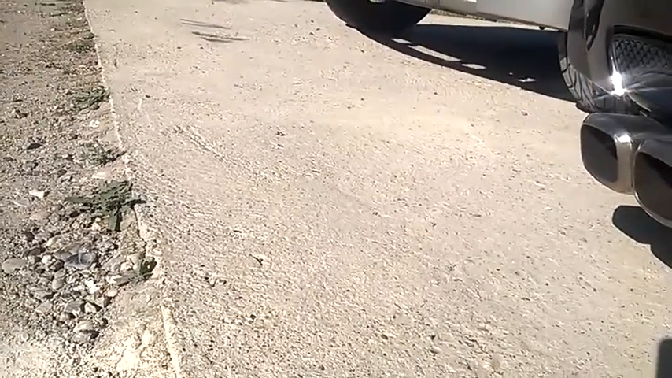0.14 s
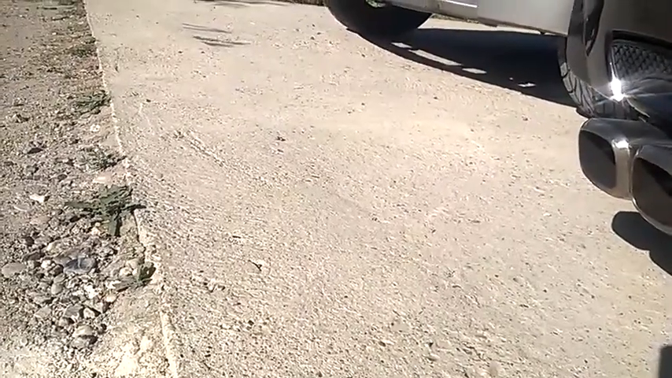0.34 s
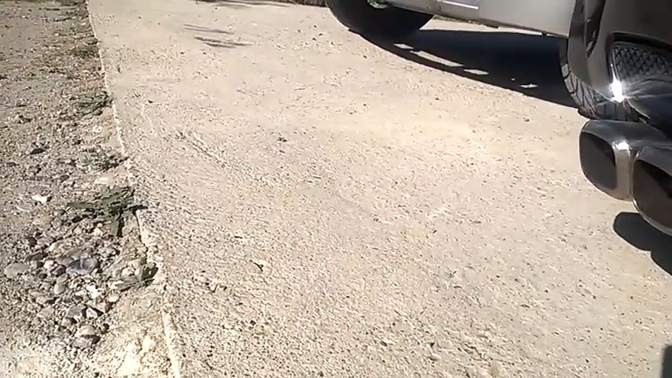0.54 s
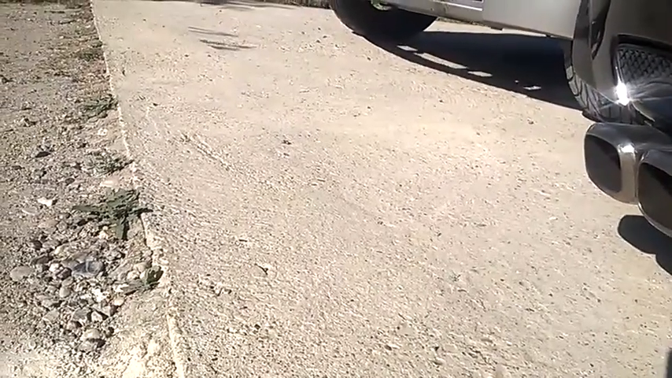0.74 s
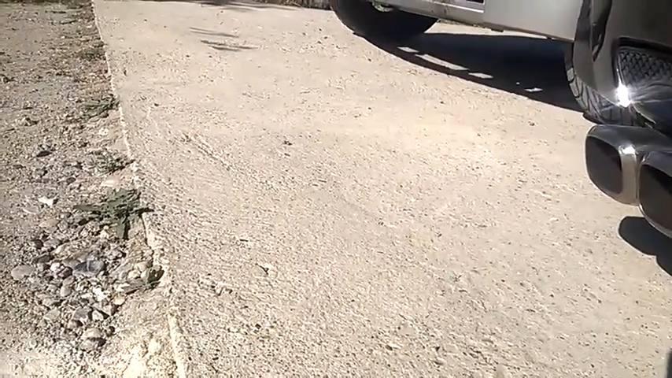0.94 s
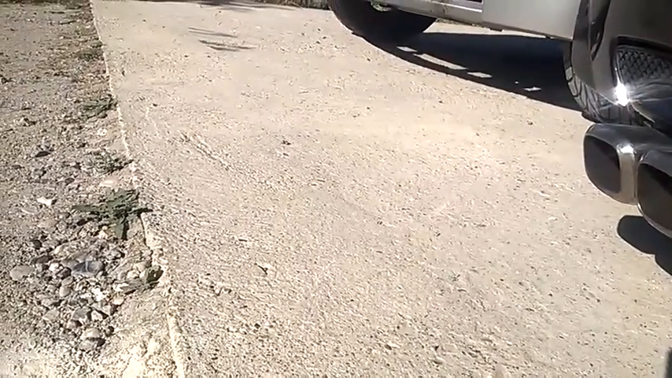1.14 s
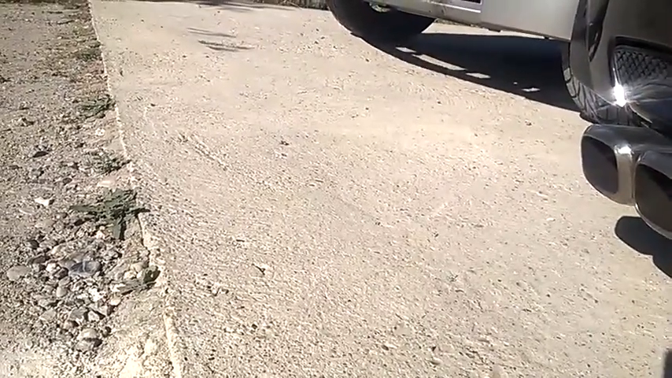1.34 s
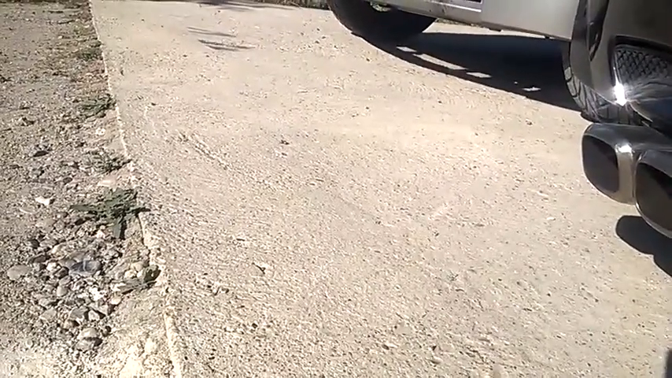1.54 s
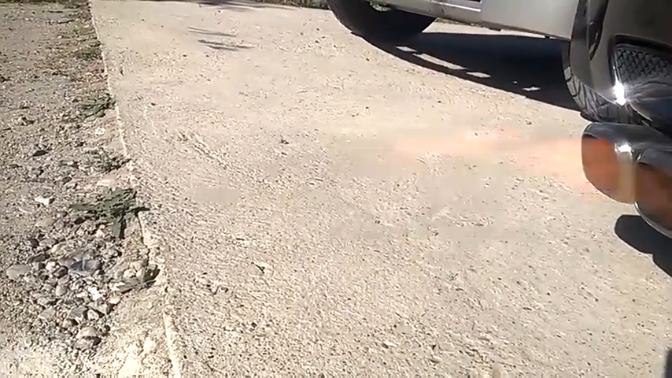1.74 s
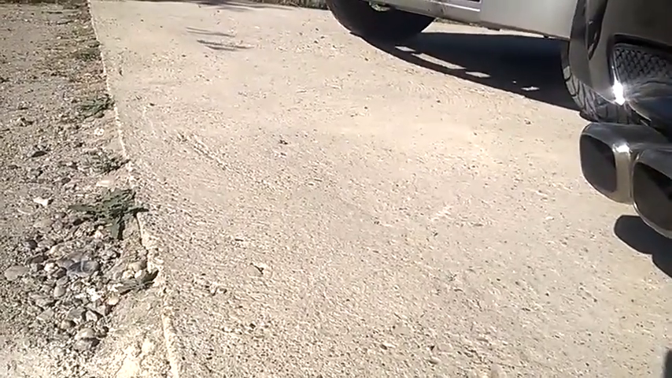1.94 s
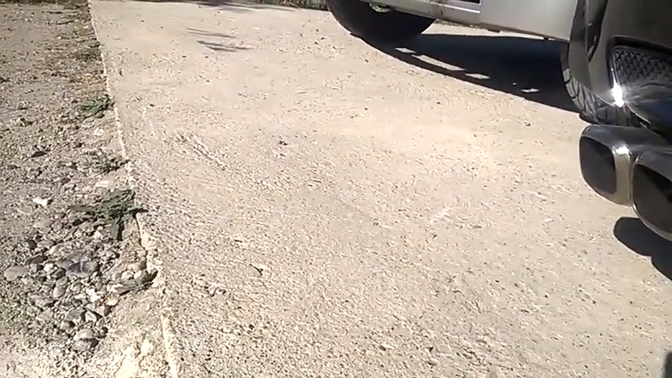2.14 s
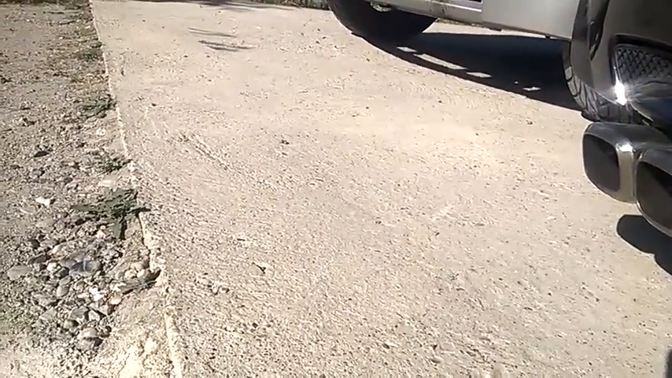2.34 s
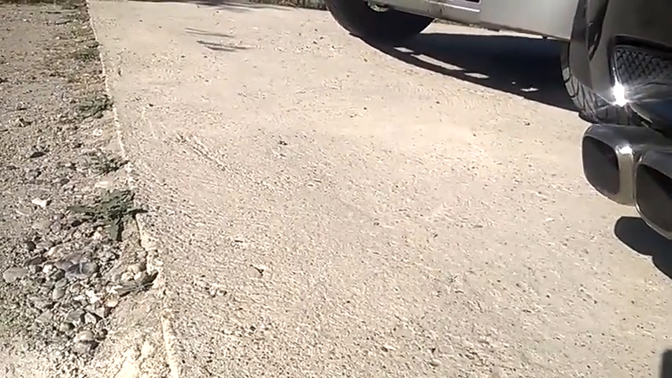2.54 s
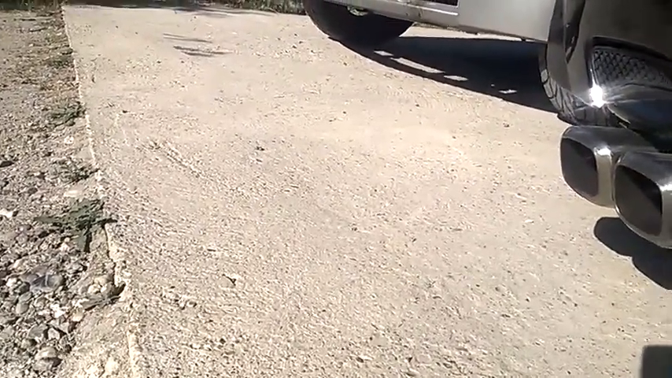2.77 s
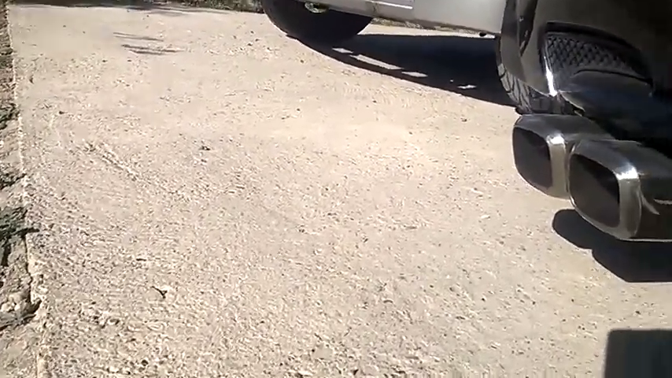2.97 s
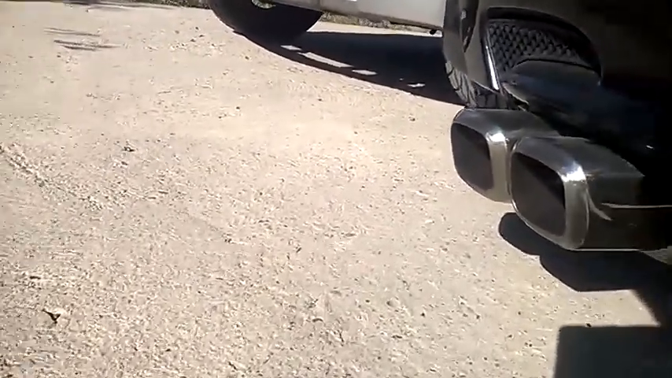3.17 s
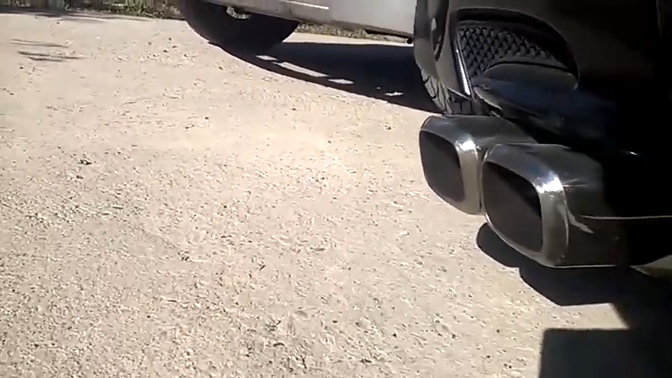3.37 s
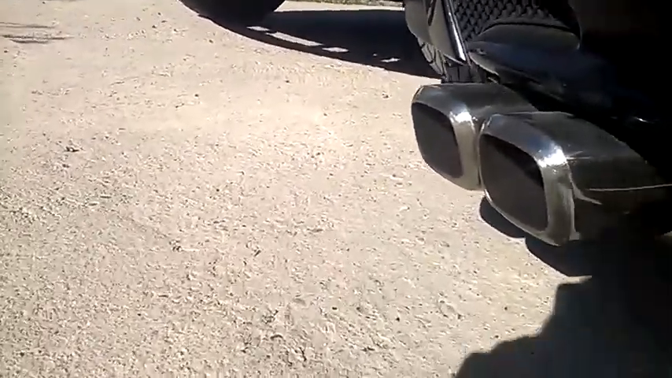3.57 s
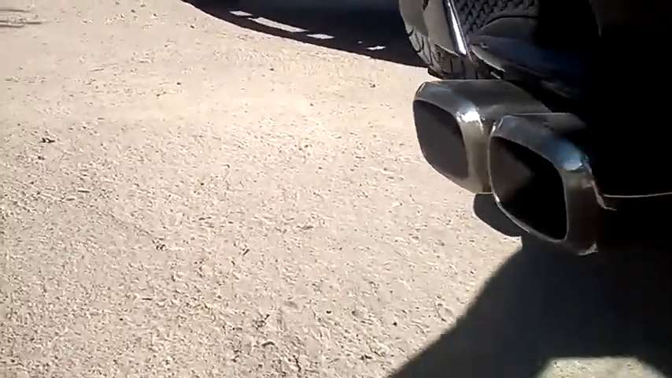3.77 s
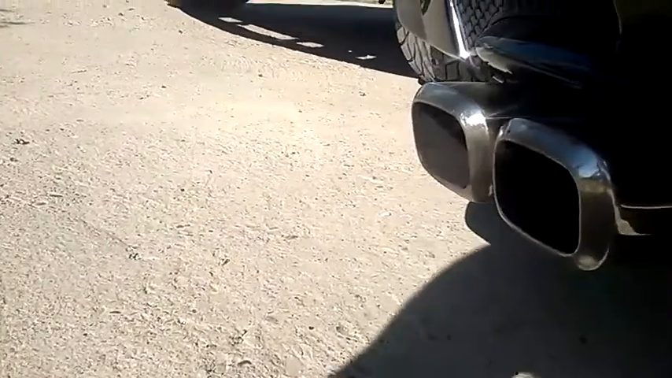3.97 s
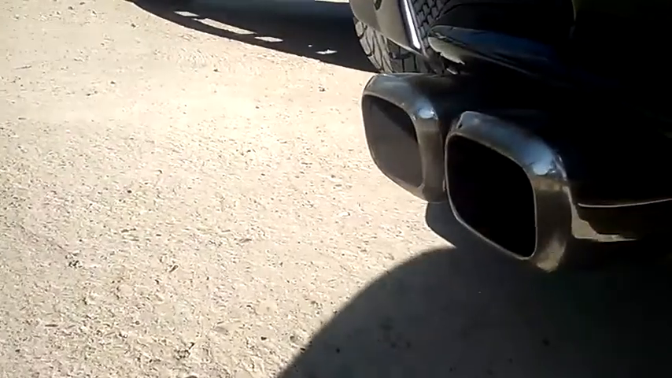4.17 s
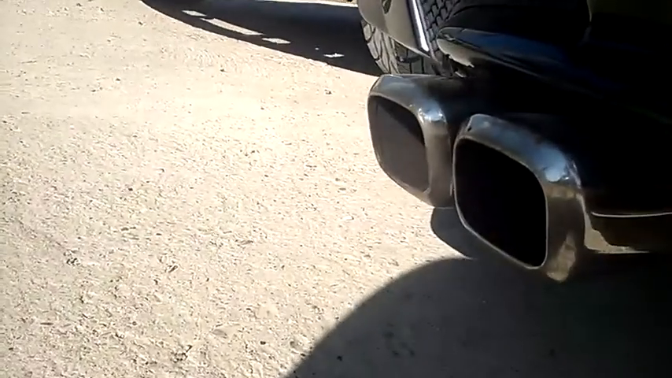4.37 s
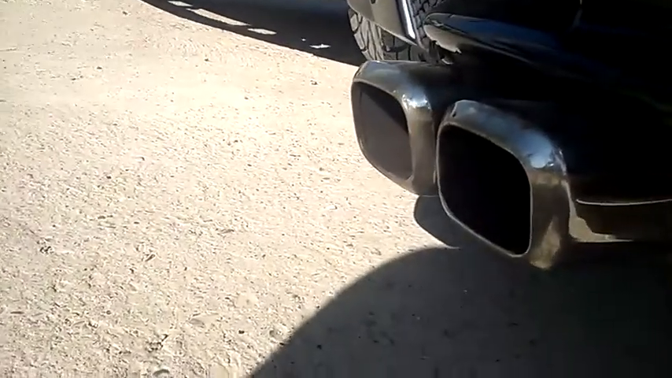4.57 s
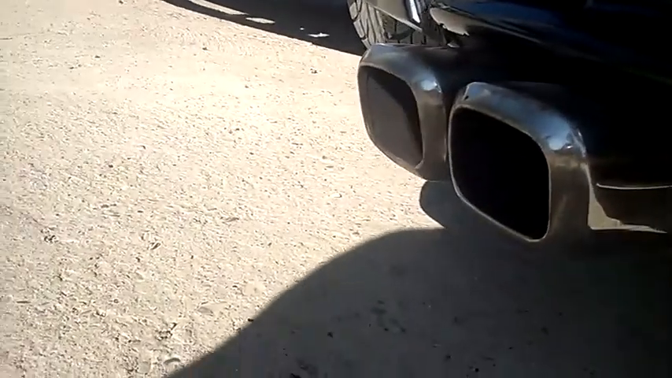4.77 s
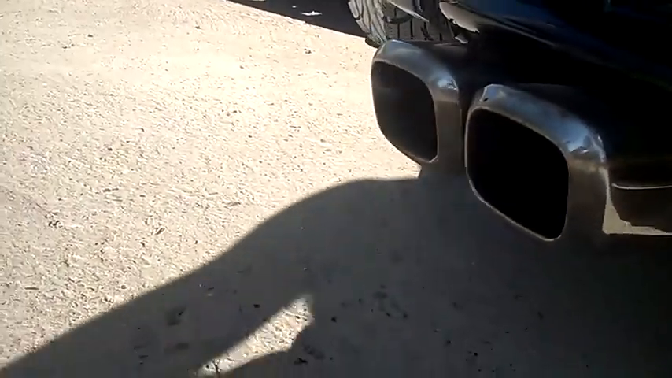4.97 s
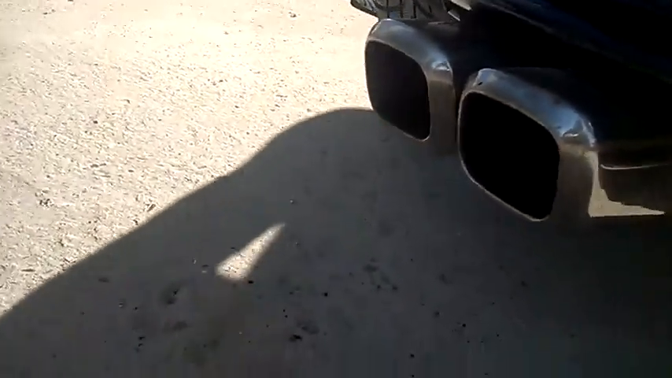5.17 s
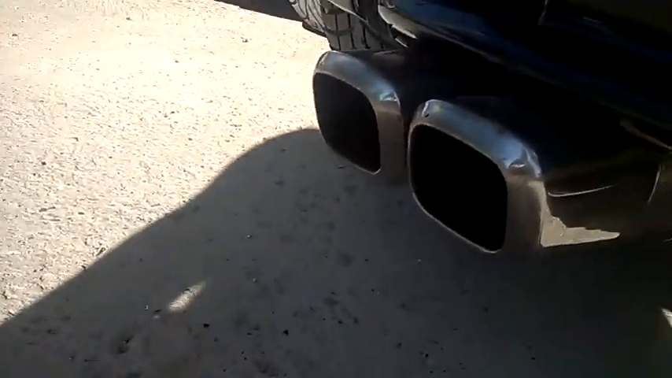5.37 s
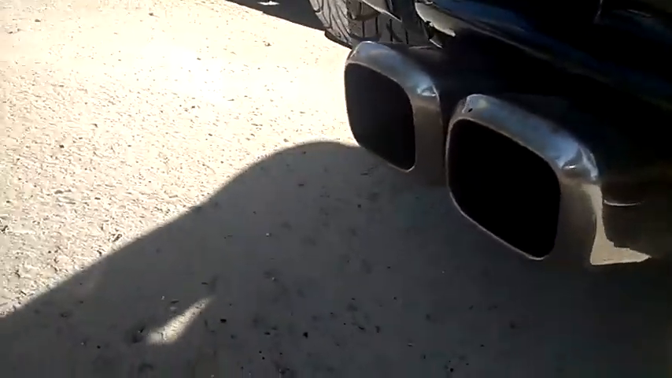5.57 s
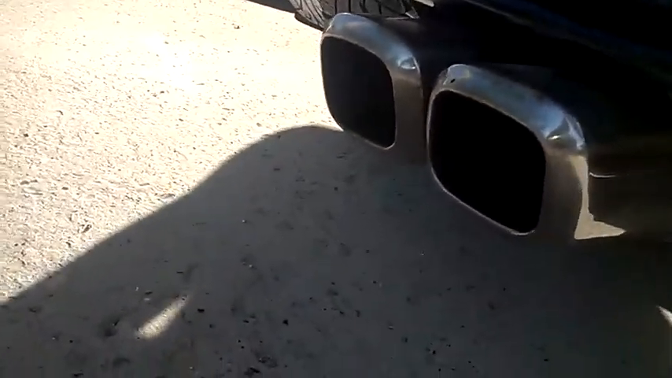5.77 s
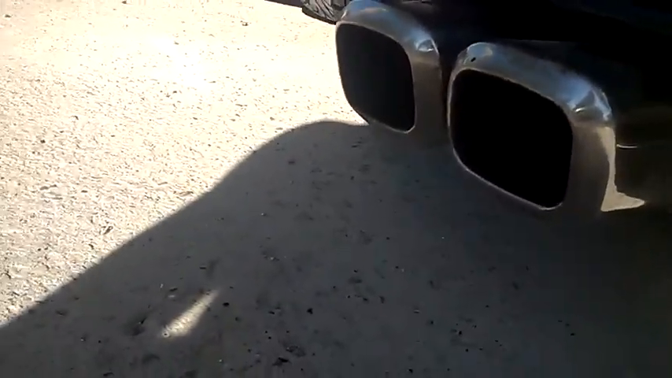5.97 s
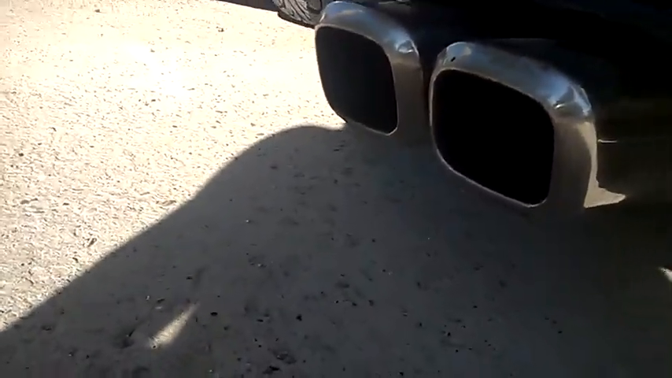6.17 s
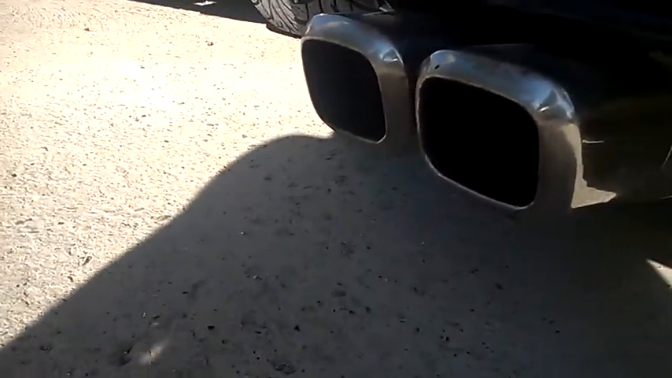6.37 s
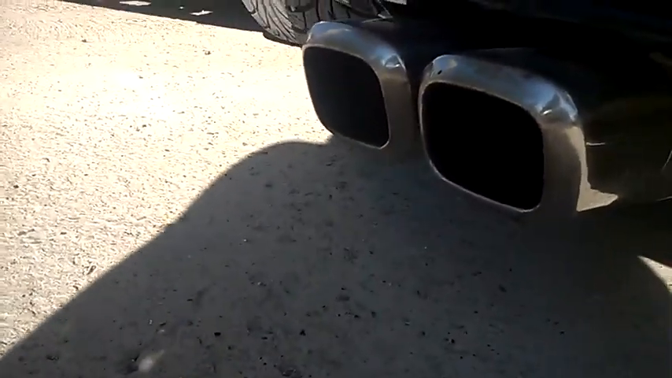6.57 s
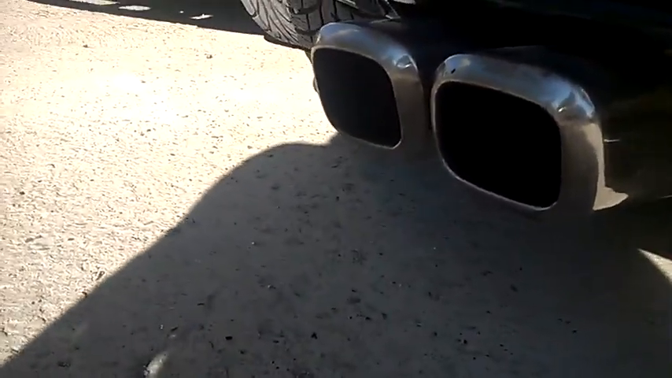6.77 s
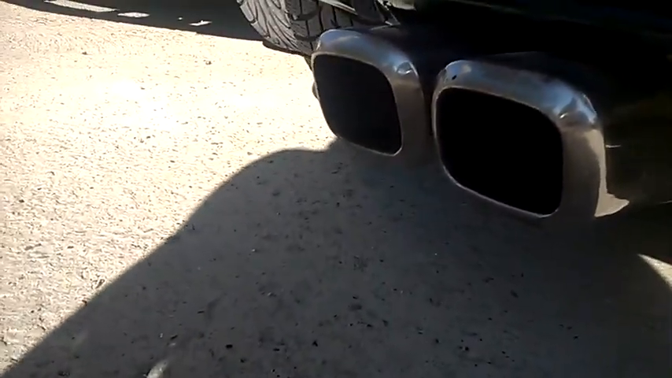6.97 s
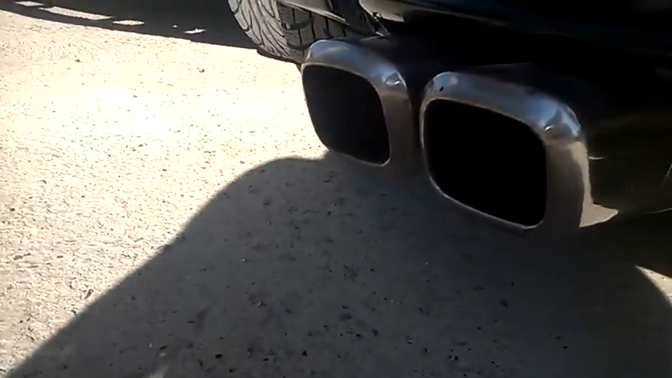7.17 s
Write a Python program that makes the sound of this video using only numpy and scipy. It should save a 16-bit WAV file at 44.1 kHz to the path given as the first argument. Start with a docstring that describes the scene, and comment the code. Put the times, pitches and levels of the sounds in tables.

```python
"""A four-cylinder petrol engine is blipped three times, heard at its tailpipes on an open lot.
Each firing is a pulse that rings the pipe; open throttle adds bark and rasp, then the revs sink to a lumpy idle.
Three backfires bang as unburnt fuel goes off: bursts of noise, each followed by a fading echo.
Engine hiss, low rumble and a few metal ticks lie underneath. The microphone overloads on the loud peaks."""
import sys
import numpy as np
from scipy import signal
from scipy.fft import rfft, irfft, next_fast_len
from scipy.io import wavfile

SR = 44100
rng = np.random.default_rng(int(sys.argv[2]) if len(sys.argv) > 2 else 0)


def put_to_file(sound):
    """Save the sound as 16-bit audio at rate SR, in the file named by the first command-line argument."""
    columns = np.atleast_2d(sound).T  # one column per channel
    safe = np.clip(columns, -1, 1)
    whole_steps = np.round(safe * 32767)
    wavfile.write(sys.argv[1], SR, whole_steps.astype(np.int16))


N = 317961  # length in samples

# In every colour table level_db is relative: the finished sound is scaled again.
# backfires: puff_start_s, blast_start_s, puff_db, blast_db, echo_db
BACKFIRES = [(1.815, 1.828, -8.5, 15, -17), (4.278, 4.299, -3, 7.5, -23.5), (7.162, 7.179, 2, 23, -13)]
# small rattles at the tailpipe: start_s, level_db
TICKS = [(3.885, -30), (3.921, -32), (3.952, -32)]
# the exhaust's broad colour: pitch_hz, level_db
PIPE_COLOUR = [(15, -40.5), (35, -5), (50, -10), (85, -2), (125, -9), (170, -12.5), (260, -21), (400, -24),
               (650, -59.5), (1000, -63), (2500, -88.5), (8000, -120)]
# the exhaust's resonances and dead spots: pitch_hz, width_hz, level_db
PIPE_MODES = [(63.3, 21.3, -8.5), (139.4, 36.6, 5), (200.1, 22.4, -28.5), (239.5, 15, 3.5),
              (261.6, 20, 2.5), (341, 57, -6.5), (399.8, 8.9, 5), (494.4, 25, 12.5), (536, 13, 10.5),
              (680, 17, -11.5)]
# colour of the bark: pitch_hz, level_db
BARK_COLOUR = [(30, -51), (80, -10.5), (130, -9.5), (180, -3), (280, -11), (450, -16), (700, -29.5),
               (1200, -39), (2500, -46.5), (8000, -95)]
# colour of the rasping gas: pitch_hz, level_db
RASP_COLOUR = [(80, -33), (300, 2.5), (700, -5), (1600, -9), (2500, -11.5), (4000, -17), (6500, -18),
               (10000, -28.5), (16000, -43)]
# colour of the engine's hiss: pitch_hz, level_db
HISS_COLOUR = [(300, -12.5), (600, 5), (950, -5), (1400, -3), (2120, -1), (2540, 0), (4080, -8.5),
               (6120, -4.5), (6900, -10.5), (8250, -14.5), (11000, -30), (15500, -55)]
# colour of the silencer's rumble: pitch_hz, level_db
RUMBLE_COLOUR = [(20, -14), (60, -20.5), (130, 16.5), (270, 9.5), (420, -13.5), (600, -42.5), (1000, -14.5),
                 (2000, -54), (5000, -84.5)]
# colour of a backfire's blast: pitch_hz, level_db
BLAST_COLOUR = [(40, -1), (200, 10), (450, -2), (800, -10), (1500, -14), (3000, -13), (7000, -58),
                (16000, -38)]
# colour of the lot's echo: pitch_hz, level_db
ECHO_COLOUR = [(30, 4), (100, 10.5), (400, -7.5), (800, -12.5), (1600, -12), (3000, -7.5), (4500, -17),
               (6500, -11), (10000, -26.5), (16000, -63.5)]
# time the echo takes to fall by 60 dB: pitch_hz, fall_s
ECHO_FALL = [(100, 0.52), (1500, 0.36), (5000, 0.27), (14000, 0.11)]
# the steel tailpipe's own ring: pitch_hz, width_hz, level_db
TAILPIPE_RING = [(514, 134, 7), (679.6, 37, 10.5), (878, 33, 4), (1532, 110, 6), (1996, 40, 10)]
# the microphone's colour: pitch_hz, level_db
MIC_COLOUR = [(20, -12.5), (60, 4), (95, -1.5), (140, -2), (400, 1.5), (750, 0), (1500, -0.5), (3000, -5),
              (10000, 0), (16000, 0)]
# silencer chambers that hold the sound back and smear each pulse: pitch_hz, width_hz
CHAMBERS = [(150, 73.2), (260, 67), (400, 103), (500, 158)]
# the pedal: press_start_s, fully_shut_s, press_time_s, full_pull (firings per second gained each second)
BLIPS = [(-.3437, .236, .06, 316.3), (2.4494, 2.9829, .094, 315.92), (4.8556, 5.4937, .1458, 321.84)]
# how each blip sounds: hard_firing_lag_s, swell_s, fade_s, bark_db, drone_db, buzz_db
VOICING = [(.03, .06, 0.036, 3, 1.5, -19), (0.0068, 0.16, 0.073, 0, -28.5, -33),
           (0.054, 0.056, 0.032, 2, 3.5, 5)]
# pulses under open throttle: speed (firings per second), push_db, bark_db, rasp_db
DRIVEN = [(42, 4.5, -13, -47.5), (74.4, 5, -8.5, -32), (86.5, -0.5, -4, -34), (93.9, 4.5, -4.5, -18),
          (118.4, 4, -18.5, -18), (141.3, 4.5, -8.5, -16.5)]
# pulses with the throttle shut, swelling where the fuel comes back on:
# speed (firings per second), push_db, bark_db
COASTING = [(40.2, -21.5, -58.5), (51, -15.5, -56), (58.1, -10.5, -56), (61.4, -5, -30), (61.5, -3.5, -31),
            (72, -10.5, -47), (86.5, -8.5, -48), (107, -6, -50), (114.2, -4, -42.5)]
# weakened firings around the shutting of the throttle: time_s, change_db
MISFIRES = [(.23, -2.5), (.425, -5), (.46, -4.5), (2.972, -7.5), (3.123, -14), (3.16, -15), (5.497, -4),
            (5.673, -3), (5.703, -9)]
# how near the microphone is: time_s, exhaust_db, engine_hiss_db
NEARNESS = [(0, 1, -0.5), (2.3, 0.5, -1), (3.2, 2, -1), (4.6, 6.5, -1), (5.6, 3, -3.5), (7.21, 6.5, -2.5)]

TOP_HZ = 15800  # nothing is recorded from here up
SHUT_TIME_S = .0403  # time the throttle takes to close
# firings per second: idle, where torque has built up, range over which the idle control takes hold
IDLE, TORQUE_KNEE, IDLE_RANGE = 37.743, 68.11, 11.144
# well above idle: firings per second lost each second, and share of the speed lost each second
FRICTION, PUMPING = 40.416, .2274
DRONE_HZ, DRONE_RANGE_HZ = 115.4, 8.1  # coasting above this firing rate, the pipe drones and buzzes
BUZZ_RASP_DB = -24.5  # gas noise, relative to that buzz
BUZZ_DB_PER_HZ = 2.8  # the buzz is strongest at the foot of the drone and weaker at higher revs
RUN_ON_S, DRONE_SWELL_S = 0.018, 0.028  # hard firings outlast the pedal; then the drone builds up
THUMP_DB, THUMP_BELOW_HZ, THUMP_RANGE_HZ = 5, 58, 22  # near idle one cylinder of the four fires harder
# mechanical hiss at 100 firings a second, and its growth with speed
WHIRR_DB, WHIRR_DB_PER_OCTAVE = -36.5, 11.5
INTAKE_DB = -41.5  # air rushing past the fully open throttle
SWELL_S, SWELL_WIDTH_S, SWELL_DB = 6.14, 0.072, -35  # the hiss swells briefly


def amp(db):
    """Decibels to gain."""
    return 10 ** (np.asarray(db) / 20)


def unit(x):
    """Scale x to an rms (average strength) of 1."""
    return x / np.sqrt(np.mean(x ** 2) + 1e-20)


def along(points, hz):
    """Read (pitch, value) points at any pitch, on a log axis."""
    f, v = np.transpose(points)
    return np.interp(np.log(hz + 1), np.log(f + 1), v)


def curves(rows):
    """One value per sample for each column after the time."""
    s, *cols = np.transpose(rows)
    return [np.interp(np.arange(N) / SR, s, c) for c in cols]


def colour(x, spectrum, modes=()):
    """Filter x with a broad spectrum and narrow peaks and dips, letting nothing sound early."""
    m = 2 * next_fast_len(len(x) // 2 + 8192, real=True)
    hz = np.fft.rfftfreq(m, 1 / SR)
    db = along(spectrum, hz)
    db = db + sum(g / (1 + (2 * (hz - f) / w) ** 2) for f, w, g in modes)
    # folding the cepstrum makes the filter respond only after its input
    cepstrum = irfft(np.log(amp(db)))
    cepstrum[1:m // 2] *= 2
    cepstrum[m // 2 + 1:] = 0
    response = np.exp(rfft(cepstrum))
    return irfft(rfft(x, m) * response)[:len(x)]


def noise(spectrum, modes=(), size=N):
    """Coloured noise of rms 1."""
    return unit(colour(rng.standard_normal(size), spectrum, modes))


def add(track, s, sound):
    """Mix a sound into the track at a time in seconds."""
    part = track[round(s * SR):][:len(sound)]
    part += sound[:len(part)]


def whirr(throttle, speed):
    """The engine's hiss grows and brightens with the revs; the open throttle adds intake air."""
    hiss = noise(HISS_COLOUR)
    dull = signal.lfilter(*signal.butter(2, 7500, fs=SR), hiss)
    bright = speed / speed.max()
    octaves = np.log2(speed / 100)
    swell = np.exp(-((np.arange(N) / SR - SWELL_S) / SWELL_WIDTH_S) ** 2)
    power = amp(WHIRR_DB + WHIRR_DB_PER_OCTAVE * octaves) ** 2
    power += throttle * amp(INTAKE_DB) ** 2
    power += swell * amp(SWELL_DB) ** 2
    return np.sqrt(power) * (bright * hiss + (1 - bright) * dull)


def rattles():
    """Loose metal ticks: short bursts of bright noise that die away at once."""
    out, t = np.zeros(N), np.arange(SR // 20) / SR
    tick_colour = [(500, 4.5), (2000, 11.0), (6000, 8), (14000, -34.0)]  # pitch_hz, level_db
    for s, db in TICKS:
        fade = amp(-60 * t / 0.021)
        add(out, s, amp(db) * fade * noise(tick_colour, size=len(t)))
    return out


def lot_echo(t):
    """The lot throws noise back; each pitch dies away at its own pace."""
    hz, when, z = signal.stft(noise(ECHO_COLOUR, TAILPIPE_RING, size=len(t)), SR, nperseg=256)
    fade = amp(-60 * when / along(ECHO_FALL, hz)[:, None])
    tail = signal.istft(z * fade, SR)[1][:len(t)]
    slap = 1 + 0.94 * amp(-60 * t / 0.3)  # the nearest wall answers first and loudest
    return slap * tail


def backfires(blast_s, echo_s, puff_hz, brighten_db):
    """A low puff as the fuel catches, a short violent blast, then the echo of the lot."""
    out, t = np.zeros(N), np.arange(SR // 2) / SR
    for puff_start_s, blast_start_s, puff_db, blast_db, echo_db in BACKFIRES:
        puff = -2.2 * np.sin(2 * np.pi * puff_hz * t) * amp(-60 * t / 0.017)
        flame = 0.11 * noise(RASP_COLOUR, TAILPIPE_RING, size=len(t)) * amp(-60 * t / 0.38)
        add(out, puff_start_s, amp(puff_db) * (puff + flame))

        age = t[t < blast_s] / blast_s  # 0 to 1 through the blast
        crack = noise(RASP_COLOUR, TAILPIPE_RING, size=len(t))[:len(age)]
        crack = amp(brighten_db * (age + 0.5) - 15) * crack  # sharper as it goes
        roar = unit(noise(BLAST_COLOUR, TAILPIPE_RING, size=len(t))[:len(age)])
        swell = np.sqrt(np.sin(np.pi * age))
        add(out, blast_start_s, amp(blast_db) * (roar + crack) * swell)

        add(out, blast_start_s + echo_s, amp(echo_db) * lot_echo(t))
    return out


def silencer(x):
    """Each chamber delays the frequencies near its own without weakening them."""
    for hz, width_hz in CHAMBERS:
        x = x - 2 * signal.lfilter(*signal.iirpeak(hz, hz / width_hz, fs=SR), x)
    return x


def flywheel():
    """Throttle opening and firings per second: torque spins the engine up, losses drag it back to idle."""
    step_s = .002
    t = np.arange(-.5, N / SR + step_s, step_s)
    pedal = []
    for on, off, press_s, _ in BLIPS:
        pedal.append(np.clip((t - on) / press_s, 0, 1) * np.clip((off - t) / SHUT_TIME_S, 0, 1))
    pedal = np.array(pedal)
    speed, speeds = IDLE, []
    for pull in np.array(BLIPS)[:, -1] @ pedal:
        torque = pull * np.tanh(speed / TORQUE_KNEE)
        drag = (FRICTION + PUMPING * speed) * np.tanh((speed - IDLE) / IDLE_RANGE)
        speed += step_s * (torque - drag)
        speeds.append(speed)
    return curves(np.column_stack([t, pedal.sum(0), speeds]))


def by_speed(rows, speed):
    """Read gains from a table of speed and decibel columns."""
    at, *cols = np.transpose(rows)
    return [amp(np.interp(speed, at, db)) for db in cols]


def effort(speed):
    """Load 0-1 and the gains of push, bark and rasp: set by speed and load, droning atop each fall."""
    t = np.arange(N) / SR
    load, edge, drone, buzz = np.zeros((4, N))
    high = np.clip((speed - DRONE_HZ) / DRONE_RANGE_HZ, 0, 1)
    for (on, off, *_), voice in zip(BLIPS, VOICING):
        lag_s, swell_s, fade_s, bark_db, drone_db, buzz_db = voice
        hard = np.clip((t - on - lag_s) / swell_s, 0, 1) * np.clip((off + RUN_ON_S - t) / fade_s, 0, 1)
        overrun = high * np.clip((t - off) / DRONE_SWELL_S, 0, 1) * (t < off + 1)
        load += hard
        edge += amp(bark_db) * hard ** 1.2
        drone += amp(drone_db) * overrun
        buzz += amp(buzz_db - BUZZ_DB_PER_HZ * (speed - DRONE_HZ)) * overrun ** 2
    driven_push, driven_bark, driven_rasp = by_speed(DRIVEN, speed)
    coast_push, coast_bark = by_speed(COASTING, speed)
    push = load * driven_push + (1 - load) * coast_push + drone
    bark = edge * driven_bark + (1 - load) * coast_bark + buzz
    rasp = load ** 2 * driven_rasp + amp(BUZZ_RASP_DB) * buzz
    return load, np.array([push, bark, rasp])


def firings(turns, speed, bank_lag, cylinder_db, scatter_db, jitter_s):
    """One pulse per firing, more uneven at low revs; every second one comes late down a longer header."""
    count = np.arange(1, int(turns[-1]))
    at = np.interp(count, turns, np.arange(N))  # sample position of each firing
    rate = speed[at.astype(int)]
    slow = (speed.mean() / rate) ** 2  # above 1 when slower than average
    chance = rng.standard_normal((len(count), 2))
    db = cylinder_db * np.minimum(slow, 1) * np.cos(np.pi * count / 2)
    db += scatter_db * np.sqrt(slow) * chance[:, 0]
    strong = count % 4 == 1
    near_idle = np.clip((THUMP_BELOW_HZ - rate) / THUMP_RANGE_HZ, 0, 1)
    not_speeding_up = np.gradient(rate) < .5
    db += THUMP_DB * strong * near_idle * not_speeding_up
    for s, change_db in MISFIRES:
        db[np.argmin(abs(at - s * SR))] += change_db
    late = bank_lag * (-1) ** count * np.minimum(slow, 1) + jitter_s * slow ** 2 * chance[:, 1]
    at = np.clip(at + late * SR, 0, N - 2)
    # share each pulse between its two nearest samples
    whole, part = at.astype(int), at % 1
    first = np.bincount(whole, amp(db) * (1 - part), N)
    second = np.bincount(whole + 1, amp(db) * part, N)
    return -SR / 200 * (first + second)


def engine():
    """Pulses ring the pipe; open throttle steepens them into an uneven bark and tears a jet from each."""
    throttle, speed = flywheel()
    near_db, hiss_db = curves(NEARNESS)
    load, gains = effort(speed)
    push, bark_gain, rasp_gain = amp(near_db) * gains
    turns = np.cumsum(speed) / SR  # firings so far
    pulses = firings(turns, speed, bank_lag=0.00021, cylinder_db=0.3, scatter_db=0.86, jitter_s=.00002)
    fronts = firings(turns, speed, bank_lag=.00004, cylinder_db=1.1, scatter_db=1.5, jitter_s=.000005)

    straight = np.minimum(4 * load, 1)  # hard pulses shoot straight through the silencer
    gas = pulses * push
    through = amp(-4.5) * gas * straight + silencer(gas * (1 - straight))
    boom = colour(through, PIPE_COLOUR, PIPE_MODES)

    bark = colour(fronts * bark_gain, BARK_COLOUR, TAILPIPE_RING)
    jet = unit(amp(-24 * (turns % 1)))  # the gas leaves at the start of each cycle
    rasp = rasp_gain * unit(colour(jet * rng.standard_normal(N), RASP_COLOUR, TAILPIPE_RING))
    # faint turbulence in the silencer
    rumble = amp(-31.5) * noise(RUMBLE_COLOUR, PIPE_MODES)
    return boom + bark + rasp + rumble + amp(hiss_db) * whirr(throttle, speed)


def scene():
    """Everything comes from the back of the car, on one channel."""
    bangs = backfires(blast_s=0.011, echo_s=0.018, puff_hz=160, brighten_db=9.5)
    return (engine() + bangs + rattles())[None]


def overload(x, top, knee):
    """The microphone flattens loud peaks; a higher knee bends more suddenly."""
    return x / (1 + abs(x / top) ** knee) ** (1 / knee)


def record(dry):
    """Bass and treble overload apart; a bass cut tilts the flattened tops; then colour and band limit."""
    bass = signal.sosfiltfilt(signal.butter(2, 3000, fs=SR, output="sos"), dry)
    treble = dry - bass
    flat = overload(bass, top=0.52, knee=54) + overload(treble, top=0.13, knee=0.62)
    wet = signal.lfilter(*signal.butter(1, 14, "high", fs=SR), flat)
    m = next_fast_len(N + SR // 2)
    hz = np.fft.rfftfreq(m, 1 / SR)
    response = amp(along(MIC_COLOUR, hz)) * (hz < TOP_HZ)
    return irfft(rfft(wet, m) * response, m)[..., :N]


dry = scene()
out = record(dry)
put_to_file(out)
```